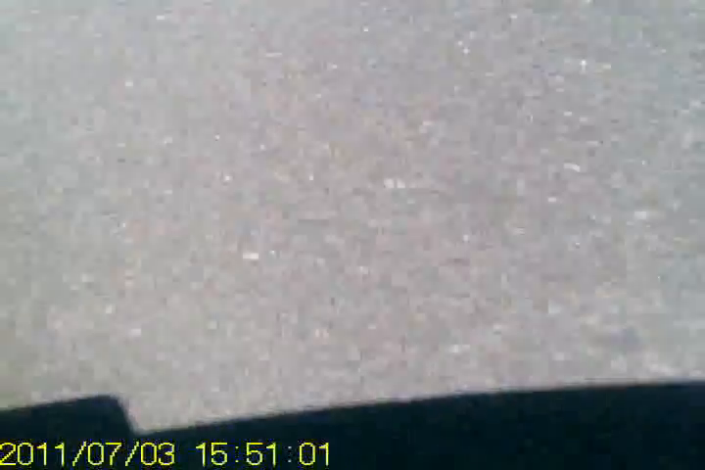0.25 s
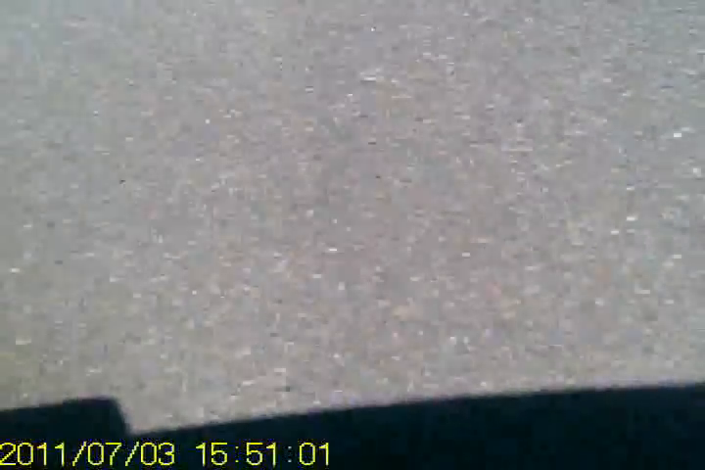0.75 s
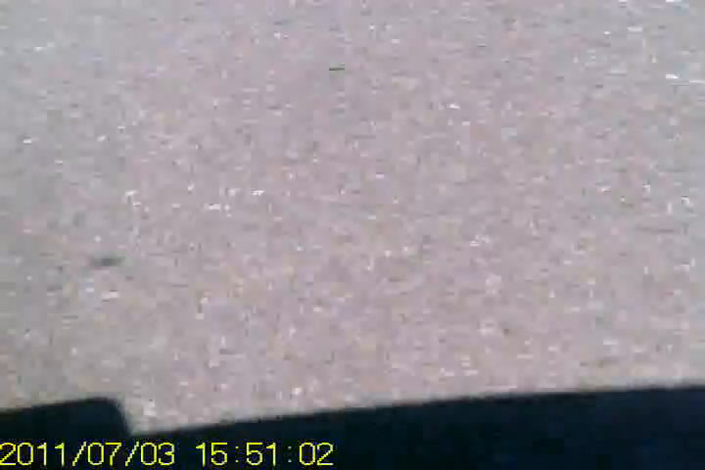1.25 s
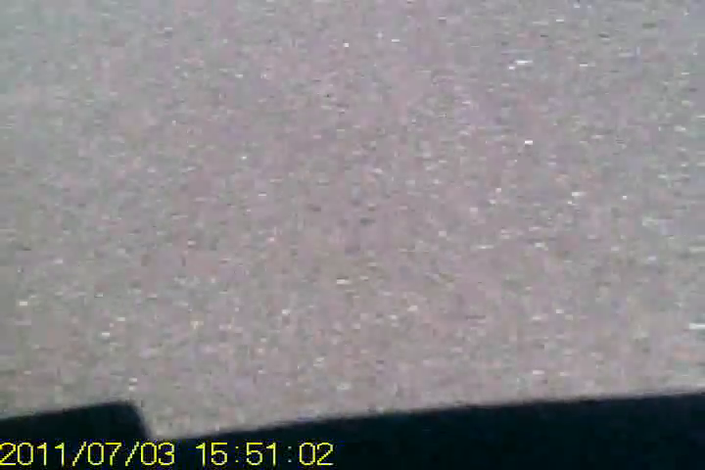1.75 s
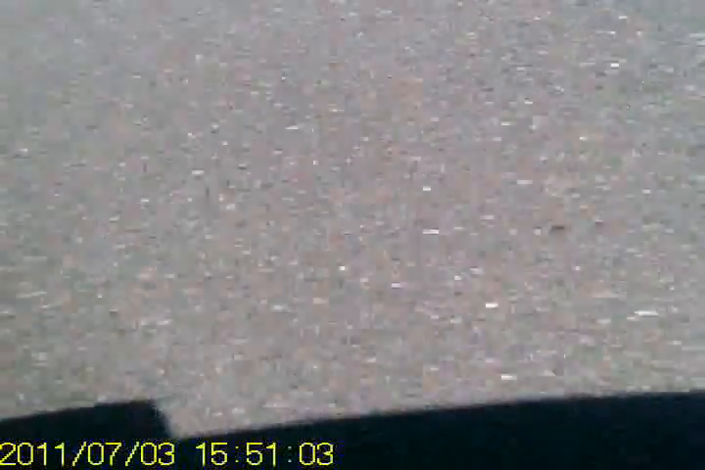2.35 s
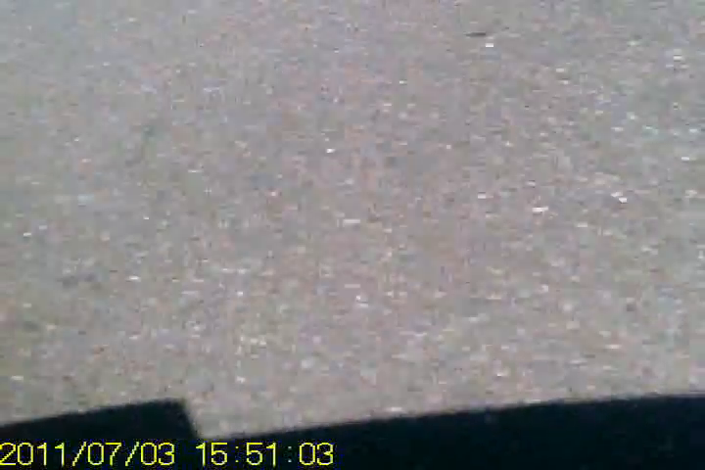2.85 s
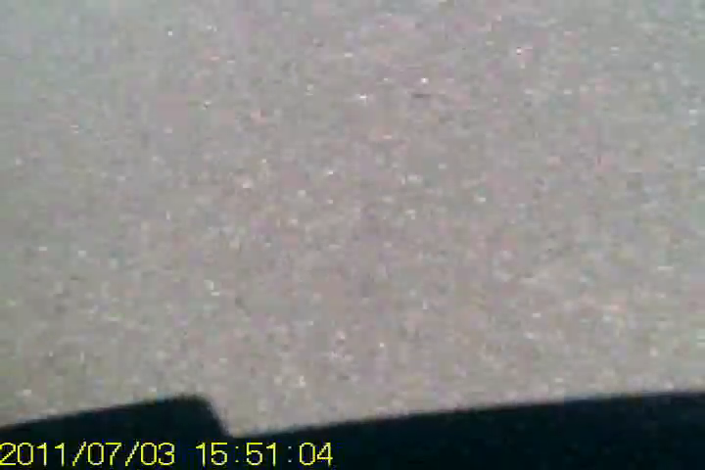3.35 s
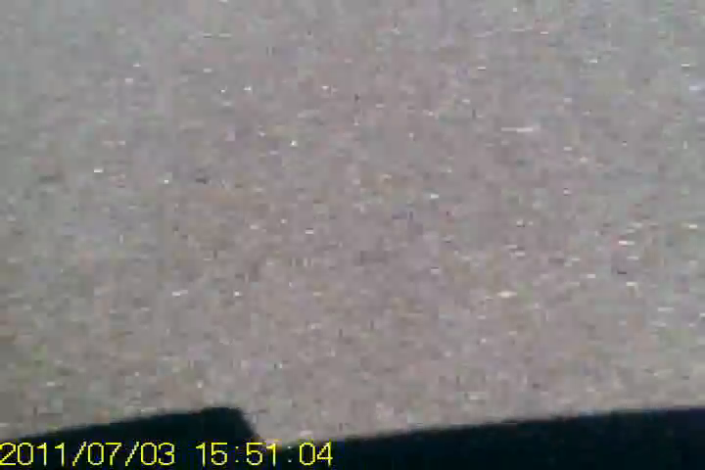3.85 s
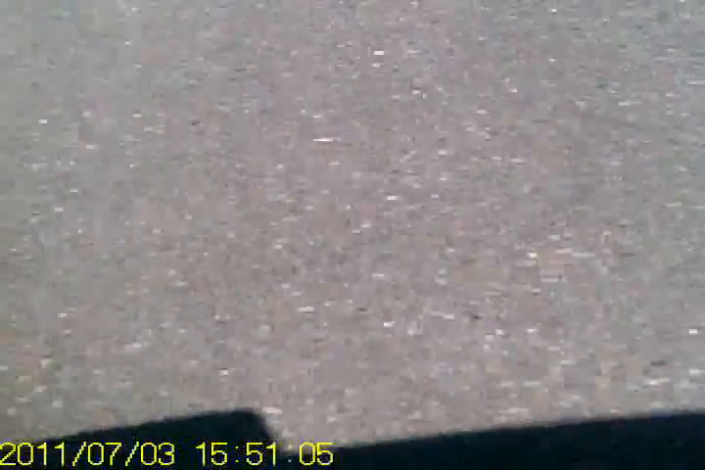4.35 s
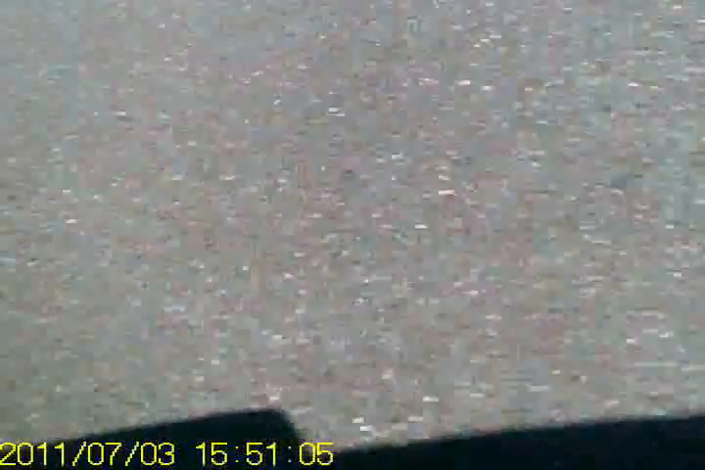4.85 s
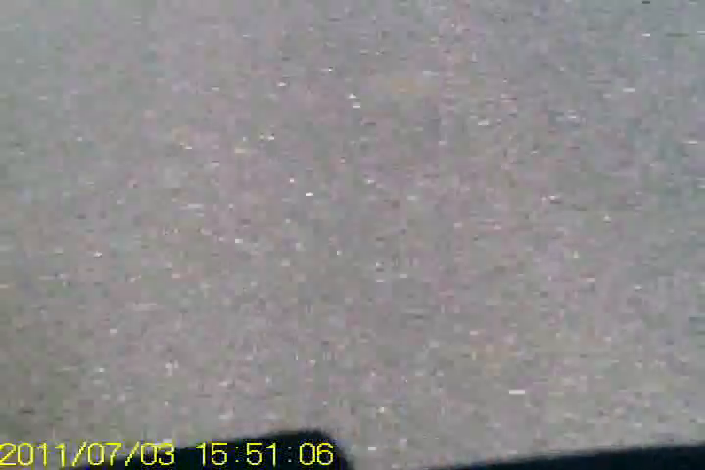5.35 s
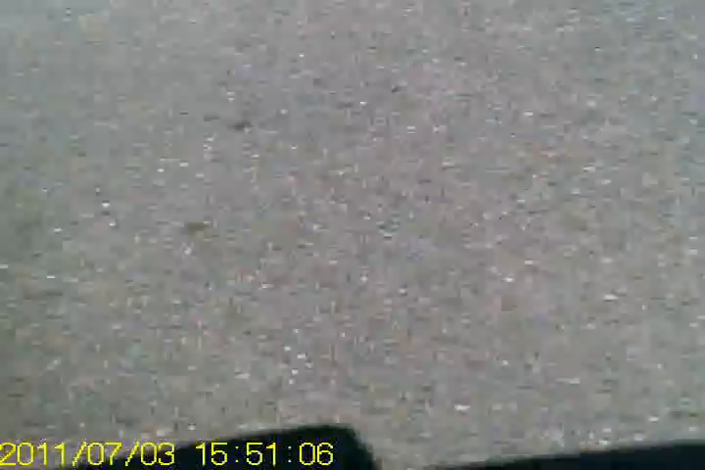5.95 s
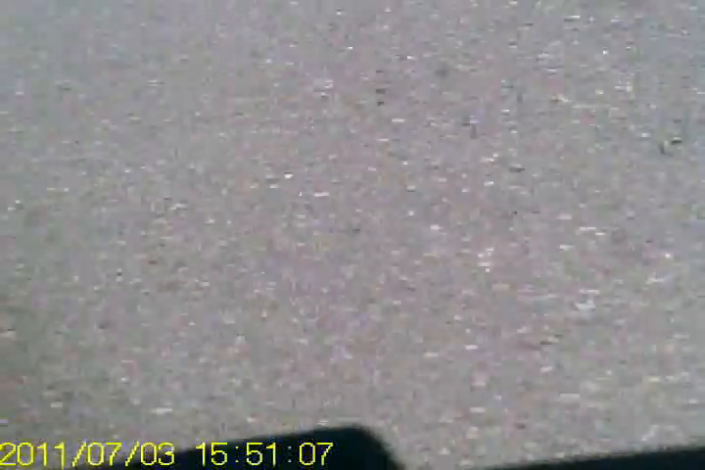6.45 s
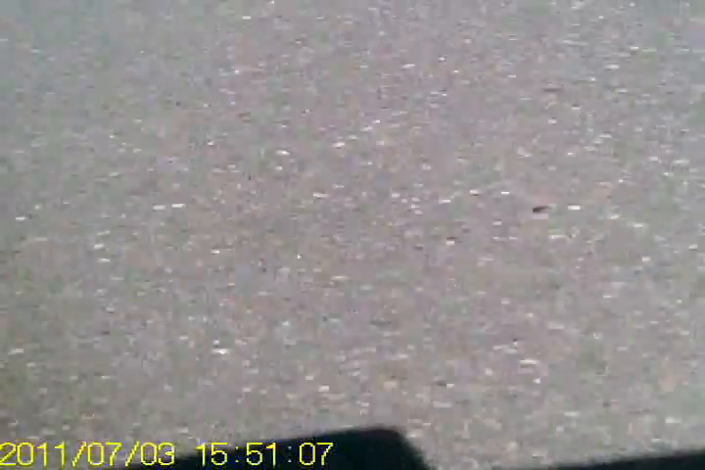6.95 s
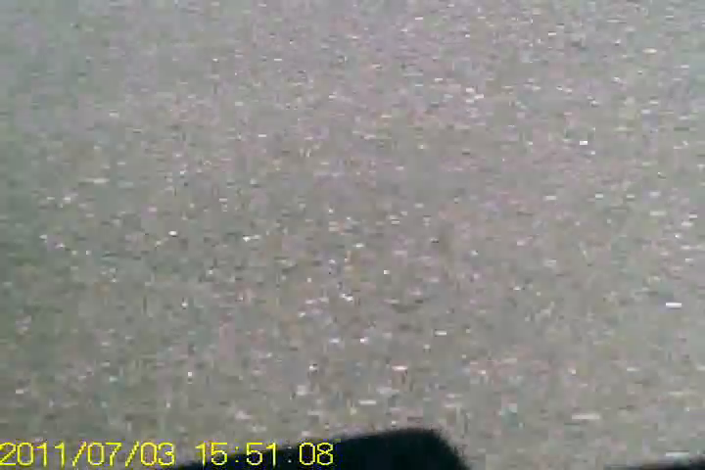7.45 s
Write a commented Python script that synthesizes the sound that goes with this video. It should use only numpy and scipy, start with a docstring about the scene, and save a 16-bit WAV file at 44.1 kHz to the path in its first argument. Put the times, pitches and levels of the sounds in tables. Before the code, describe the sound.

A small four-cylinder sports car is heard from on board, driving on asphalt. From the start the engine pulls with a deep, booming exhaust drone, its pitch creeping up only slightly, over tyre roar and low wind buffeting on the microphone. At about 3.7 seconds the throttle lifts and the revs sag, with a couple of dull bumps and light ticks of grit against the body until 4.3 seconds. At 4.5 seconds a quick throttle blip for a downshift sends the revs up. They dip around 5.2 seconds and rise again by 5.5 seconds. From there the engine brakes the car, its exhaust raspy and ragged, falling slowly in pitch. From about 6 seconds the tyres roar more coarsely and the body panels drum. Another grit tick and soft bump come at 7.3 seconds, and the car is still rolling at the end, near 7.7 seconds.

```python
"""Sports car downshift, on board

A small four-cylinder pulls at about 3900 rpm; the driver lifts, blips for a downshift and lets the
engine brake the car. Two firings per turn boom and ring the exhaust pipe; the block shakes once per turn.
Coarse asphalt makes the tyres roar and the panels drum. Wind buffets the microphone, grit ticks
against the body and bumps thud."""
import sys
import numpy as np
from scipy import signal
from scipy.fft import rfft, irfft
from scipy.io import wavfile
from scipy.ndimage import uniform_filter1d

SR = 44100
rng = np.random.default_rng(int(sys.argv[2]) if len(sys.argv) > 2 else 0)


def put_to_file(sound):
    """Save the sound as 16-bit audio at rate SR, in the file named by the first command-line argument."""
    columns = np.atleast_2d(sound).T  # one column per channel
    safe = np.clip(columns, -1, 1)
    whole_steps = np.round(safe * 32767)
    wavfile.write(sys.argv[1], SR, whole_steps.astype(np.int16))


N = 340011
TIME_S = np.arange(N) / SR

# crank speed: t/s, f/Hz
CRANK_SPEED = [(0, 71.5), (.1, 64.6), (.2, 64.2), (3.55, 66.85), (3.75, 65.4), (4.2, 64.4), (4.44, 57.2),
               (4.53, 55.5), (4.6, 61), (4.8, 82.5), (4.86, 85), (5.03, 78.3), (5.17, 74.4), (5.33, 82.7),
               (5.45, 86.4), (5.6, 84.8), (6, 83.07), (7.4, 76), (7.71, 74.8)]
# pull and blip: press/s, lift/s, opening after lift/1, gas level/dB, extra hiss/dB
PEDAL_PRESSES = [(-.03, 3.666, 0.18, -33.5, 4), (4.515, 4.85, 0.01, -31, 5.5)]
# surge on taking up throttle: t/s, length/s, gain/dB
ENGINE_SURGES = [(0.057, 0.12, 4), (4.542, 0.034, 2)]
# exhaust on the overrun: t/s, boom level/dB, rasp level/dB
OVERRUN_LEVELS = [(3.7, -25.5, -52), (4.3, -26.5, -44), (4.51, -20.5, -51), (4.86, -32.5, -35),
                  (5.15, -29.5, -28.5), (5.3, -28, -31.5), (5.45, -25, -26), (5.8, -27, -30),
                  (6.3, -26.5, -27), (7.15, -25.5, -25), (7.71, -26, -28.5)]
# low orders: crank multiple/1, open-throttle level/dB re boom, closed-throttle level/dB re rasp
ENGINE_ORDERS = [(.5, -39, -13.5), (1.5, -19.5, -24.5), (2.5, -33, -33), (3, -12, -29), (3.5, -25, -35.5),
                 (4, -19, -10.5), (4.5, -46, -34.5), (5, -24, -42), (5.5, -39, -39.5), (6, -22, -19),
                 (7, -35, -11), (9, -52, -13)]
# cabin resonances: f/Hz, width/Hz, gain/dB
CABIN_MODES = [(322.3, 13, 5), (590, 20, 4)]
# cylinders in firing order: level/dB, delay/turns
CYLINDER_PULSES = [(-1.5, 0.0018), (-6, 0.0067), (-1, 0.0017), (-5.5, 0.0049)]
# pipe resonances, open and closed throttle: f/Hz, width/Hz, gain/dB
PIPE_MODES_OPEN = [(624.5, 65, 4), (746, 111, 5.5)]
PIPE_MODES_CLOSED = [(608.4, 82, 20.5), (717, 160, -10.5)]
# noise spectra: f/Hz, relative level/dB
GAS_SPECTRUM = [(90, -11.5), (140, 11), (250, 6), (400, 1.5), (520, -0.5), (720, 0), (900, -2.5),
                (1100, -25.5), (2000, -43)]
TYRE_ROAR_SPECTRUM = [(530, -42), (900, -6.5), (1060, -1.5), (1160, -2.5), (1510, -1.5), (1830, -7.5),
                      (1980, -10), (2570, -10), (3120, -19.5), (4200, -32), (5460, -51), (9240, -120)]
TYRE_LOW_SPECTRUM = [(100, -8.5), (180, -0.5), (260, -4.5), (400, -6.5), (600, -6.5), (800, -3.5),
                     (950, -28), (1300, -36.5)]
HISS_SPECTRUM = [(1880, -26), (3200, -17), (3670, -1.5), (3960, 3), (4440, 2.5), (4890, 0), (5790, 3.5),
                 (6640, -2), (7200, -2.5), (8030, 1), (9010, -3.5), (9880, 0.5), (10400, -3.5),
                 (11800, -18), (15300, -45.5), (22000, -120)]
WIND_SPECTRUM = [(7, -12), (18, -2), (32, -12.5), (45, -15), (70, -18), (125, -28.5), (200, -33),
                 (400, -43)]
# asphalt coarseness as tyre roar: t/s, level/dB re smooth road
ROAD_COARSENESS = [(0, 6), (.2, -0.5), (3.6, 0), (3.85, -3.5), (4.1, -.5), (5.25, 0), (5.9, 1.9),
                   (6.3, 3.5), (6.8, 2.5), (7.05, 5.5), (7.71, 4.5)]
# body panel resonances: f/Hz, width/Hz, relative level/dB
PANEL_MODES = [(59.1, 10, 2), (101, 12, -2.5)]
# gusts and one lull: t/s, level/dB re steady wind
WIND_GUSTS = [(.56, 7), (4.87, 6), (5.44, 6.5), (6.49, 7), (7.0, -2), (7.3, 2)]
# spurts of bright hiss: t/s, length/s, level/dB
HISS_SPURTS = [(1.22, .03, -53), (2.05, 0.031, -52), (3.78, 0.022, -51.5), (4.548, 0.0084, -48),
               (4.777, 0.055, -49.5), (5.052, 0.014, -47), (5.475, 0.057, -51), (5.914, 0.017, -47),
               (6.316, 0.018, -47), (7.02, .09, -53)]
# grit hitting the body: t/s, strike level/dB, f/Hz
GRIT_HITS = [(3.763, -48, 4200), (4.081, -40, 3000), (4.145, -39, 3530), (4.289, -31, 2780),
             (5.113, -37, 3320), (7.262, -31, 3200), (7.274, -46, 3900)]
# road bumps: t/s, length/s, level/dB, f/Hz
ROAD_BUMPS = [(3.817, 0.018, -22, 50), (4.092, 0.044, -23, 70.4), (4.107, 0.051, -35, 204),
              (7.265, 0.024, -27.5, 200)]


def from_db(db):
    """Decibels to gain."""
    return 10 ** (np.asarray(db) / 20)


def unit_rms(x):
    """Scale to unit power."""
    return x / np.sqrt(np.mean(x ** 2) + 1e-20)


def curves(rows):
    """Columns of a timed table at every sample."""
    times_s, *columns = np.transpose(rows)
    return [np.interp(TIME_S, times_s, column) for column in columns]


def drift(rate_hz):
    """Slow random wander, unit RMS."""
    r = np.exp(-80 * np.pi * rate_hz / SR)
    slow = signal.lfilter([1], [1, -2 * r, r * r], rng.standard_normal(N // 40 + 2002))[2000:]
    return np.interp(np.arange(N) / 40, np.arange(len(slow)), unit_rms(slow))


def noise(spectrum):
    """Steady coloured noise, unit RMS."""
    hz, db = np.transpose(spectrum)
    bins_hz = np.maximum(np.fft.rfftfreq(N, 1 / SR), 1)
    gain = from_db(np.interp(np.log(bins_hz), np.log(hz), db))
    skirts = np.minimum(bins_hz / hz[0], 1) ** 2 * np.minimum(hz[-1] / bins_hz, 1) ** 2
    return unit_rms(irfft(rfft(rng.standard_normal(N)) * gain * skirts, N))


def resonate(x, hz, width_hz):
    """One resonance, unit peak gain."""
    r = np.exp(-np.pi * width_hz / SR)
    poles = [1, -2 * r * np.cos(2 * np.pi * hz / SR), r * r]
    return signal.lfilter(np.array([1, 0, -1]) * (1 - r * r) / 2, poles, x + 1e-18)


def resonate_twice(x, hz, width_hz, widen=2):
    """Two resonances in series, the second wider."""
    return resonate(resonate(x, hz, width_hz), hz, widen * width_hz)


def swell(at_s, length_s):
    """Gaussian envelope, peak 1."""
    return np.exp(-2 * ((TIME_S - at_s) / length_s) ** 2)


def pedal(travel_s=0.03, full_opening=0.94):
    """The latest press sets pedal travel, throttle, time past the lift, gas level and extra hiss."""
    presses = np.array(PEDAL_PRESSES)
    latest = np.maximum(np.searchsorted(presses[:, 0], TIME_S) - 1, 0)
    press_s, lift_s, rest, gas_db, hiss_db = presses[latest].T
    down = np.clip(np.minimum(TIME_S - press_s, lift_s - TIME_S) / travel_s, 0, 1)
    throttle = np.clip(rest + (full_opening - rest) * down, 0, 1)
    return down, throttle, TIME_S - lift_s, gas_db, down * hiss_db


def engine_levels(crank_hz, down, past_lift_s, surge_db, cruise_hz=64.1):
    """Shake, boom and rasp in dB; the pedal blends load and overrun."""
    octaves = np.log2(crank_hz / cruise_hz)
    easing_db = 12 * np.exp(-np.abs(past_lift_s) / 0.042)  # near a lift: boom collapses, block rocks
    shake_db = -29.5 + surge_db + easing_db
    boom_db = -16 - 17 * octaves + surge_db - easing_db
    rasp_db = -28 - 8 * np.exp(-((crank_hz - 67.46) / 2.76) ** 2)  # harmonics miss the pipe modes
    lull_db = -8.5 * np.exp(-np.abs(past_lift_s) / 0.014)
    coast_boom_db, coast_rasp_db = np.array(curves(OVERRUN_LEVELS)) + lull_db
    coast_shake_db = coast_boom_db - 7.5 + 8.5 * octaves
    load_db = np.array([shake_db, boom_db, rasp_db])
    coast_db = np.array([coast_shake_db, coast_boom_db, coast_rasp_db])
    return down * load_db + (1 - down) * coast_db


def cabin_gain(hz):
    """A tone swells as it glides through the cabin's resonances."""
    peaks_db = sum(db * np.exp(-((hz - mode_hz) / width_hz) ** 2)
                   for mode_hz, width_hz, db in CABIN_MODES)
    return from_db(peaks_db - 2.5)


def exhaust_boom(turns, throttle, boom_db, rasp_db, waver=0.06, stray=0.086):
    """Firing tone, twice per turn, and other low orders; all waver with combustion scatter."""
    out = -from_db(boom_db - 0.08) * (1 + waver * drift(29)) * np.sin(4 * np.pi * turns)
    pulling, coasting = throttle * from_db(boom_db), (1 - throttle) * from_db(rasp_db)
    crank_hz = np.gradient(turns) * SR
    for order, open_db, closed_db in ENGINE_ORDERS:
        gain = pulling * from_db(open_db) + coasting * from_db(closed_db) * cabin_gain(order * crank_hz)
        phase_rad = 2 * np.pi * order * turns + stray * drift(8.9)
        out -= gain * (1 + stray * drift(13)) * np.sin(phase_rad)
    return np.sqrt(2) * out


def pipe_ring(turns, modes, scatter, jitter_s_per_scatter):
    """Two uneven blow-down pulses per turn ring the pipe; power is held level."""
    firing = np.arange(int(2 * turns[-1]))
    pulse_db, delay_turns = np.array(CYLINDER_PULSES)[firing % len(CYLINDER_PULSES)].T
    fire_s = np.interp(firing / 2 + delay_turns, turns, TIME_S)
    time_error, size_error = rng.standard_normal((len(firing), 2)).T * np.interp(fire_s, TIME_S, scatter)
    at = np.clip((fire_s + jitter_s_per_scatter * time_error) * SR, 0, N - 1).astype(int)
    pulses = np.zeros(N)
    pulses[at] = from_db(pulse_db) * (1 + size_error)
    ring = sum((-1) ** k * from_db(db) * resonate_twice(pulses, hz, width_hz)
               for k, (hz, width_hz, db) in enumerate(modes))
    return ring / np.sqrt(np.abs(uniform_filter1d(ring ** 2, size=4000)) + 1e-16)


def exhaust_rasp(turns, throttle, braking, rasp_db, lag_turns=0.088):
    """Throttle blends two pipe rings; the closed one grows ragged as engine braking builds."""
    pulling = pipe_ring(turns - lag_turns, PIPE_MODES_OPEN, np.full(N, 0.2), 0.0003)
    coasting = pipe_ring(turns - lag_turns, PIPE_MODES_CLOSED, 0.023 + 0.04 * braking ** 2, 0.0019)
    return from_db(rasp_db - 1.68) * (np.sqrt(throttle) * pulling + np.sqrt(1 - throttle) * coasting)


def puffs(turns, lag_turns, sharpness, weak_gain):
    """Gas envelope: one strong and one weak puff per turn; alternate turns differ."""
    swing = np.cos(2 * np.pi * (turns - lag_turns))
    strong = np.exp(sharpness * (swing - 1))
    weak = weak_gain * np.exp(-sharpness * (swing + 1))
    return unit_rms((1 + 0.16 * np.cos(np.pi * turns)) * (strong + weak))


def exhaust_gas(turns, throttle, gas_db):
    """Turbulent gas leaves in puffs on open throttle."""
    envelope = puffs(turns, lag_turns=0.056, sharpness=0.85, weak_gain=0.5)
    return throttle * from_db(gas_db - 1) * envelope * noise(GAS_SPECTRUM)


def driveline(turns, throttle, braking, shake_db, lead_turns=0.32):
    """Block shake; valve buzz and ring under load; gear whine and a thin whistle on the overrun."""
    shake_gain = np.sqrt(2) * from_db(shake_db + 3) * (1 + 0.065 * drift(33))
    shake = -shake_gain * np.sin(2 * np.pi * (turns + lead_turns))
    gear_gain = from_db(-46.5) * (1 + 0.21 * drift(9.7))
    gears = gear_gain * np.sin(2 * np.pi * 13.42 * turns + 0.71 * drift(7.6))
    whistle = from_db(-64) * unit_rms(resonate(rng.standard_normal(N), hz=4070, width_hz=70))
    buzz = sum(from_db(-0.6 * k) * np.sin(4 * np.pi * k * turns + 0.5 * drift(6.3)) for k in range(7, 14))
    ring = from_db(-57.5) * unit_rms(resonate(rng.standard_normal(N), hz=1729, width_hz=24))
    return shake + braking * (gears + whistle) + throttle * (from_db(-55.5) * buzz + ring)


def tyres_and_hiss(turns, throttle, road_db, load_hiss_db):
    """Roar and hiss follow the asphalt; with throttle they pulse more with the engine."""
    roar_share, hiss_share = 0.28 * throttle, 0.27 + 0.26 * throttle
    roar_puffs = puffs(turns, lag_turns=0.044, sharpness=1.9, weak_gain=0.24)
    hiss_puffs = puffs(turns, lag_turns=0.15, sharpness=3.1, weak_gain=0.36)
    throb = np.sqrt(1 - roar_share + roar_share * roar_puffs ** 2)
    spit = np.sqrt(1 - hiss_share + hiss_share * hiss_puffs ** 2 * from_db(1.1 * drift(40)))
    roar = throb * noise(TYRE_ROAR_SPECTRUM) * from_db(0.6 * drift(27))
    rumble = from_db(0.7) * noise(TYRE_LOW_SPECTRUM)
    hiss_db = -56.5 + 0.52 * road_db + load_hiss_db + 0.92 * drift(40)
    return from_db(-43.5 + road_db) * (roar + rumble) + from_db(hiss_db) * spit * noise(HISS_SPECTRUM)


def panel_drum(road_db):
    """The road shakes the panels, far harder on coarse asphalt."""
    white = rng.standard_normal(N)
    modes = sum(from_db(db) * unit_rms(resonate_twice(white, hz, width_hz, widen=3))
                for hz, width_hz, db in PANEL_MODES)
    return from_db(-42 + 3.2 * road_db) * unit_rms(modes)


def wind(road_db, gust_s=0.046):
    """Low buffeting on the microphone, with brief gusts."""
    gust_db = sum(db * swell(at_s, gust_s) for at_s, db in WIND_GUSTS)
    return from_db(-26.5 + 0.5 * road_db + gust_db) * noise(WIND_SPECTRUM)


def hiss_spurts():
    """Short spurts of bright hiss, two of them on the throttle blip."""
    hiss = noise([(2500, 2), (4000, -6), (9500, -5.5), (12000, -19)])
    return hiss * sum(from_db(db) * swell(at_s, length_s) for at_s, length_s, db in HISS_SPURTS)


def grit_ticks(white, decay_s=0.0028):
    """Each grain rings the body with a short noise burst."""
    out = np.zeros(N)
    for at_s, db, hz in GRIT_HITS:
        age_s = TIME_S - at_s
        burst = white * (age_s > 0) * np.exp(-np.minimum(np.abs(age_s) / decay_s, 20))
        out += from_db(db + 9) * resonate_twice(burst, hz, width_hz=600)
    return out


def bump_thuds(white):
    """Each bump is a dull swell of low noise."""
    return sum(from_db(db) * swell(at_s, length_s) * unit_rms(resonate_twice(white, hz, hz / 2))
               for at_s, length_s, db, hz in ROAD_BUMPS)


def scene(braking_rise_s=1.4):
    """Crank speed and pedal drive the engine; asphalt drives the road noise. Mono."""
    crank_hz, = curves(CRANK_SPEED)
    road_db, = curves(ROAD_COARSENESS)
    turns = np.cumsum(crank_hz) / SR
    down, throttle, past_lift_s, gas_db, load_hiss_db = pedal()
    braking = np.clip(past_lift_s / braking_rise_s, 0, 1)
    surge_db = sum(db * swell(at_s, length_s) for at_s, length_s, db in ENGINE_SURGES)
    shake_db, boom_db, rasp_db = engine_levels(crank_hz, down, past_lift_s, surge_db)
    rasp_db += 0.31 * np.maximum(road_db, 0) * drift(13.5)  # wavers on coarse asphalt
    engine = exhaust_rasp(turns, throttle, braking, rasp_db)
    engine += exhaust_gas(turns, throttle, gas_db + surge_db)
    engine += exhaust_boom(turns, throttle, boom_db, rasp_db)
    engine += driveline(turns, throttle, braking, shake_db)
    road = tyres_and_hiss(turns, throttle, road_db, load_hiss_db + 0.36 * surge_db) + panel_drum(road_db)
    white = rng.standard_normal(N)
    transients = hiss_spurts() + grit_ticks(white) + bump_thuds(white)
    return (engine + road + transients + wind(road_db))[None]


def record(dry, cutoff_hz=11900, fade_s=0.004):
    """Short fades at both ends, then a low-pass."""
    fade = np.clip(np.minimum(TIME_S, TIME_S[-1] - TIME_S) / fade_s, 0, 1)
    return signal.fftconvolve(dry * fade, signal.firwin(255, cutoff_hz, fs=SR)[None], mode="same")


dry = scene()
out = record(dry)
put_to_file(out)
```